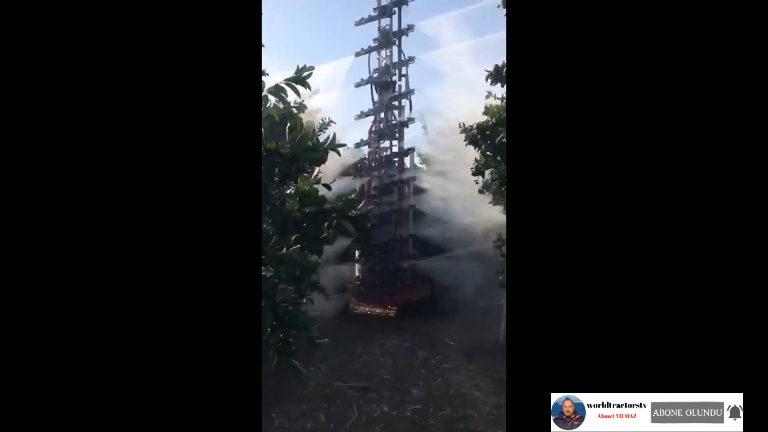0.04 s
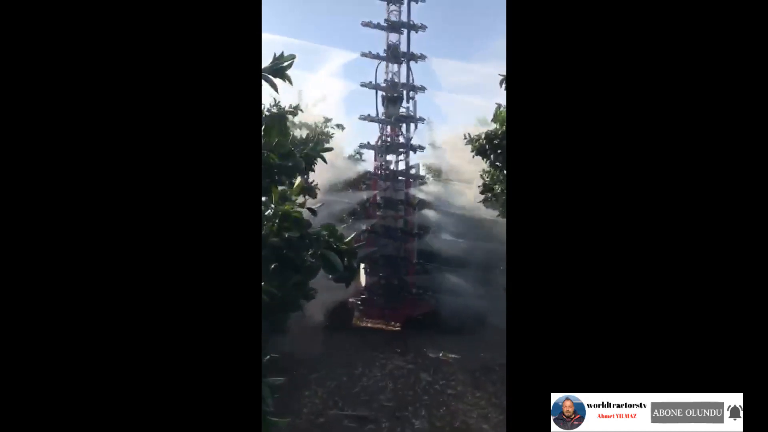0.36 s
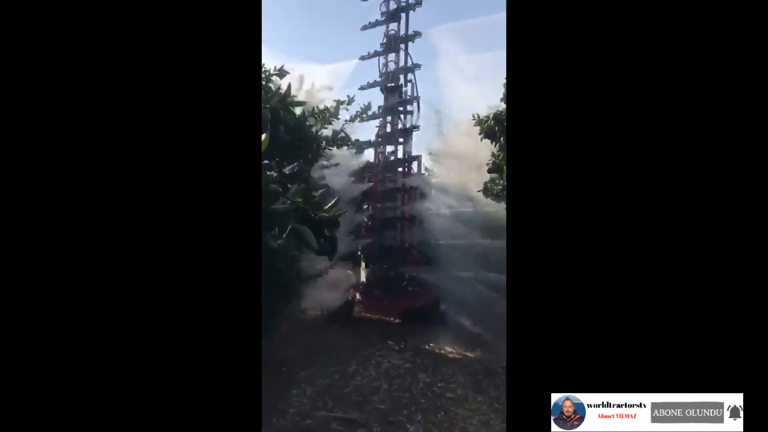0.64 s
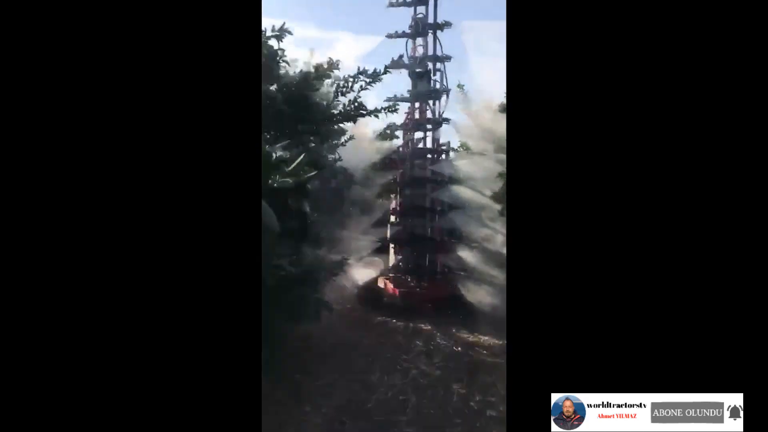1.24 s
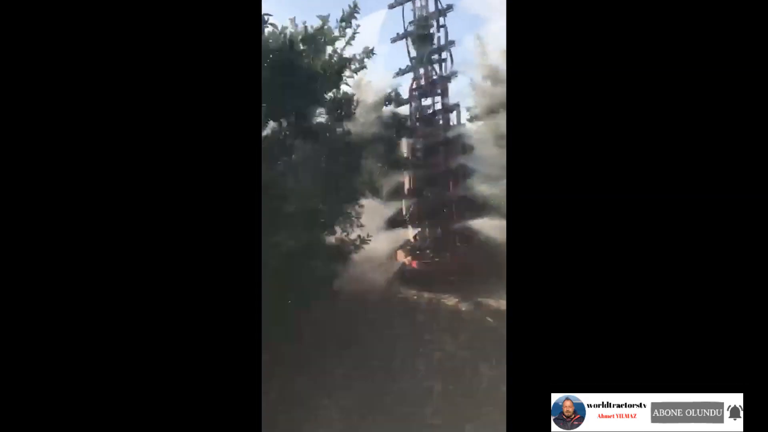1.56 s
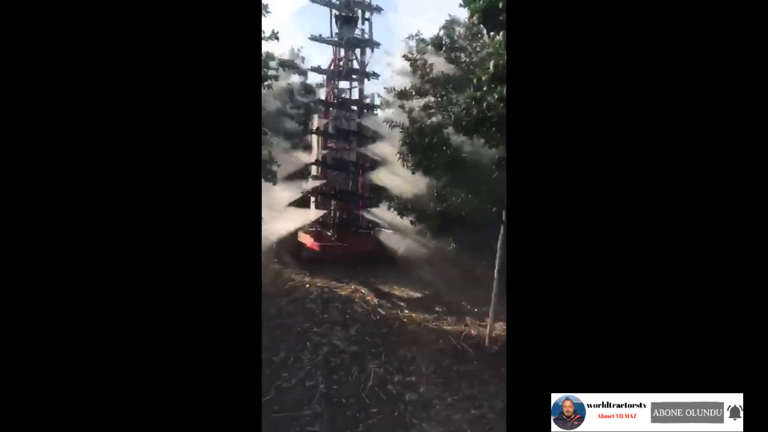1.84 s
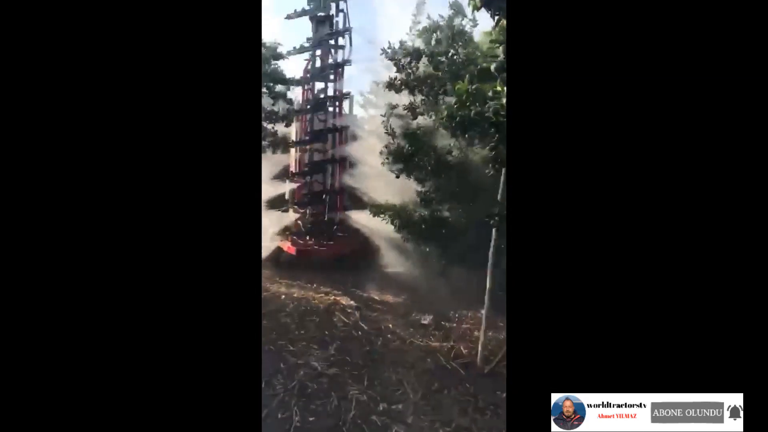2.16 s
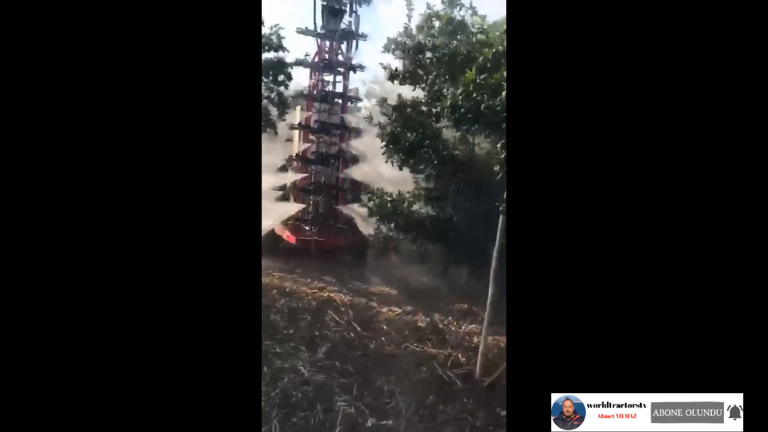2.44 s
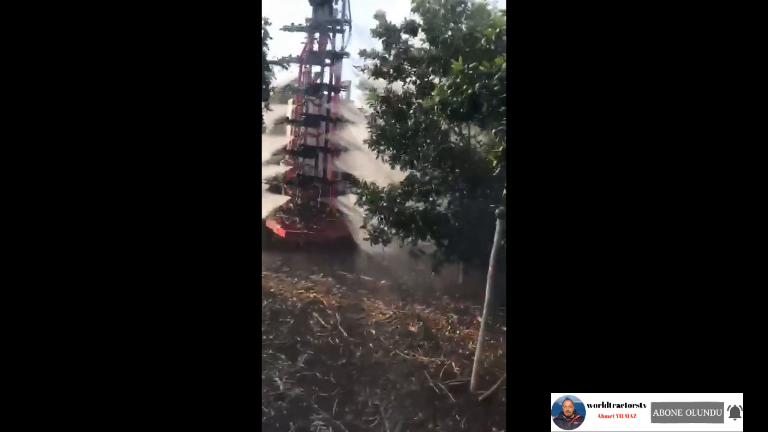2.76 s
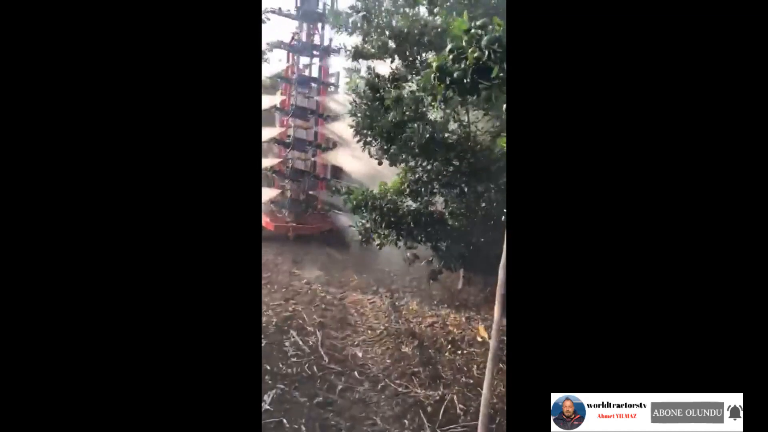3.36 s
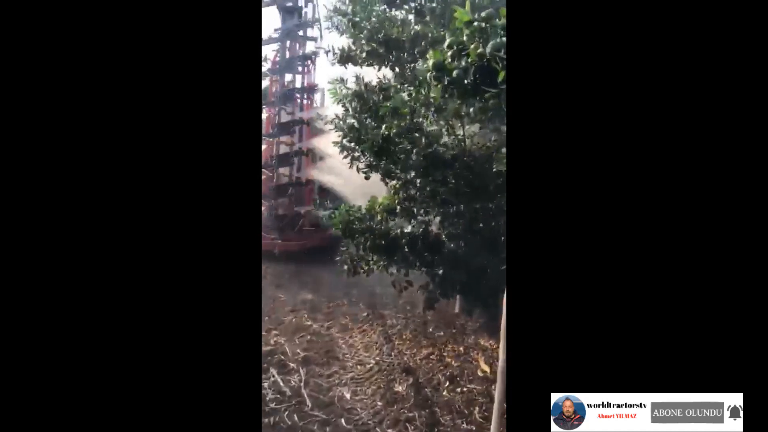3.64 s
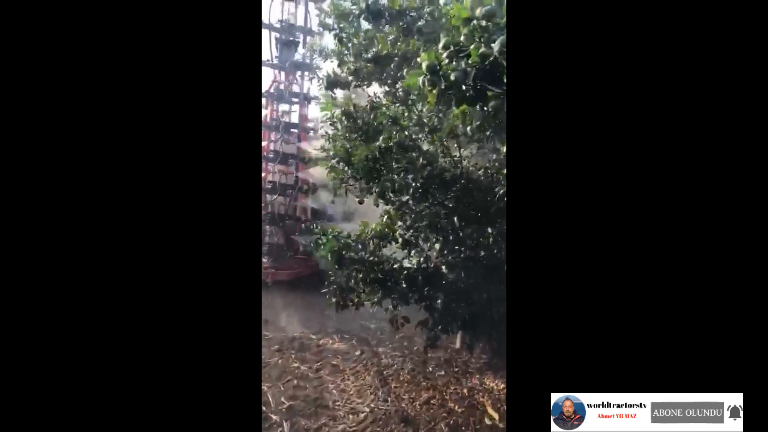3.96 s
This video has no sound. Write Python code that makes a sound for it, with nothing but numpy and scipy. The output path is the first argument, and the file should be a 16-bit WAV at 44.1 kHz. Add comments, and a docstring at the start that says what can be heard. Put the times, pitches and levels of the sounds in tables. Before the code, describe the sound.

A tower sprayer hissing loudly over its roaring blower and a droning tractor engine.

```python
"""A bright hiss of spray comes first, swelling whenever the mist blows into the nearby leaves.
It comes from the nozzles of a tall tower sprayer, towed by a tractor between orchard trees,
away from a mono microphone. Under the hiss the blower roars with a faint blade tone,
and the engine drones at a steady speed over a low rumble."""
import sys
import numpy as np
from scipy import signal
from scipy.fft import rfft, irfft, next_fast_len
from scipy.io import wavfile
from scipy.ndimage import uniform_filter1d, map_coordinates

SR = 44100
rng = np.random.default_rng(int(sys.argv[2]) if len(sys.argv) > 2 else 0)


def waveform_to_disk(signal):
    """Save audio, clipped to [-1, 1], as 16-bit WAV at the path in sys.argv[1]."""
    frames = np.transpose(np.atleast_2d(signal))
    scaled = np.clip(frames, -1, 1) * 32767
    samples = np.round(scaled).astype(np.int16)
    wavfile.write(sys.argv[1], SR, samples)


N = 176400


def amp(db):
    """Decibels to gain."""
    return 10 ** (np.asarray(db) / 20)


def unit(x):
    """Scaled to rms 1."""
    return x / np.sqrt(np.mean(x ** 2) + 1e-20)


def along(points, hz):
    """(Hz, value) points read on a log axis."""
    f, v = np.transpose(points)
    return np.interp(np.log(hz + 1), np.log(f + 1), v)


def curve(rows):
    """(s, value) rows as one value per sample."""
    return np.interp(np.arange(N) / SR, *np.transpose(rows))


def wobble(rate):
    """A smooth random curve, rate knots a second."""
    return map_coordinates(rng.standard_normal(int(N * rate / SR) + 4), [np.arange(N) * rate / SR])


def filtered(x, response):
    """x times a response of frequency."""
    m = next_fast_len(N + SR // 2)
    return irfft(rfft(x, m) * response(np.fft.rfftfreq(m, 1 / SR)), m)[..., :N]


def rush(spectrum, patchy_db):
    """Turbulent noise of rms 1, with patches of random gain."""
    bins = signal.stft(rng.standard_normal(N), nperseg=512)[2]
    patches = uniform_filter1d(rng.standard_normal(bins.shape), size=8, axis=0)
    patches = uniform_filter1d(patches, size=16, axis=1)
    noise = signal.istft(bins * amp(patchy_db * unit(patches)), nperseg=512)[1][:N]
    return unit(filtered(noise, lambda hz: amp(along(spectrum, hz))))


def tone(hz):
    """A sine of rms 1 that follows a pitch curve."""
    return np.sqrt(2) * np.sin(2 * np.pi * (np.cumsum(hz) / SR + rng.random()))


# The machine's low end, heard between the trees. Each row: frequency in Hz, level in dB per Hz.
RUMBLE_SPECTRUM = [(25, -32), (40, -16), (52, -5), (72, -6.5), (95, -5.5), (135, -5.5), (170, -2),
                   (195, -2.5), (235, -8), (280, -5), (350, -12.5), (470, -20.5), (900, -33)]


def rumble():
    """Engine and blower together make a low, slightly wavering noise."""
    return amp(-42 + 0.63 * wobble(10)) * rush(RUMBLE_SPECTRUM, patchy_db=0.0)


# The tractor's firing note at the microphone. Each row: time in seconds, level in dB.
FIRING_LEVEL = [(0, -40), (.15, -41.5), (.45, -43), (.57, -39.5), (1.13, -40), (1.21, -51), (1.42, -42),
                (1.56, -54), (1.75, -42), (1.86, -45), (2.0, -36.5), (2.1, -41), (2.22, -39), (2.47, -45.5),
                (2.75, -43), (3.0, -42), (3.34, -38.5), (3.49, -48), (3.6, -40), (3.7, -49), (3.77, -40),
                (3.84, -47), (4, -41)]
# Overtones as it pulls away. Each row: multiple of the firing rate, start and end levels in dB.
ENGINE_OVERTONES = [(2, -50.5, -46.5), (3, -49.5, -50), (7.5, -64.5, -64.5), (8.5, -66, -69)]


def engine():
    """The cylinders fire at a steady rate: a low note and its overtones, each wavering in level."""
    firing_hz = np.full(N, 58.85)
    drone = amp(curve(FIRING_LEVEL) + 0.6 * wobble(14)) * tone(firing_hz)
    for multiple, start_db, end_db in ENGINE_OVERTONES:
        level_db = np.linspace(start_db, end_db, N) + 0.8 * wobble(4.0)
        drone += amp(level_db) * tone(multiple * firing_hz)
    return drone


# Air leaving the blower, behind the tractor. Each row: frequency in Hz, level in dB per Hz.
ROAR_SPECTRUM = [(150, -41), (400, -8.5), (480, -8), (560, -1), (680, 0.5), (860, -5), (1020, 0),
                 (1180, -0.5), (1270, 1.5), (1380, -1), (1600, 0.5), (1800, -5), (2100, -5), (3000, -9.5),
                 (6000, -39)]
# That roar at the microphone. Each row: time in seconds, level in dB.
BLOWER_LEVEL = [(0.0, -40), (0.05, -38), (0.23, -39.5), (1.29, -38.5), (3.69, -39), (4.0, -38)]


def blower():
    """Rushing air makes a broad roar, and the passing blades a faint, drifting tone."""
    blade_hz = 162.3 * (1 + 0.0039 * wobble(3.01))
    blades = amp(-49.5 + 1.6 * wobble(5.37)) * tone(blade_hz)
    return blades + amp(curve(BLOWER_LEVEL)) * rush(ROAR_SPECTRUM, patchy_db=0.5)


# The tower's jets at the microphone. Each row: time in seconds, level in dB.
RASP_LEVEL = [(0, -50), (.86, -52), (.96, -41), (1.15, -47), (1.6, -49), (1.89, -38.5), (2.1, -44),
              (2.35, -40.5), (2.69, -40), (2.76, -46), (2.93, -45), (3.05, -50), (4, -48)]


def jets(flutter_hz, centre_hz=4080, width_hz=1100):
    """The jets rasp in a narrow band of noise that flutters in the air stream."""
    noise = rng.standard_normal(N)
    rasp = unit(filtered(noise, lambda hz: 1 / (1 + (2 * (hz - centre_hz) / width_hz) ** 2)))
    return amp(curve(RASP_LEVEL) + 1.6 * wobble(flutter_hz)) * rasp


# Mist striking the nearby leaves. Each row: frequency in Hz, level in dB per Hz.
MIST_SPECTRUM = [(700, -13), (1800, -5.5), (2400, 0), (3300, 1.5), (4100, 1), (4900, -0.5), (5900, 5),
                 (7000, 3), (7700, 0), (9300, 6), (10400, 2), (11200, 6.5), (12000, -10)]
# Its strength at the microphone. Each row: time in seconds, level in dB.
MIST_SWELLS = [(0, -34.5), (.25, -39), (.37, -36), (.48, -43), (.6, -32), (.72, -35.5), (.87, -41),
               (.955, -29), (1.06, -29.3), (1.15, -34), (1.37, -28.3), (1.44, -31.5), (1.66, -29),
               (1.88, -30), (1.98, -32.5), (2.07, -28), (2.38, -33), (2.69, -33.5), (2.75, -42),
               (3.05, -42), (3.58, -40), (3.76, -45), (3.87, -36), (3.91, -30), (4, -33)]


def mist(flutter):
    """Mist blows into the leaves in swells of hiss."""
    return amp(curve(MIST_SWELLS) + 0.73 * flutter) * rush(MIST_SPECTRUM, patchy_db=0.9)


# Nozzle hiss, rippled by the path to the microphone. Each row: frequency in Hz, level in dB per Hz.
NOZZLE_SPECTRUM = [(800, -44), (2000, -7.5), (3000, -3), (3900, -0.6), (4600, -0.8), (4900, -3), (5500, 0),
                   (6200, -1.5), (7200, -1.5), (7650, -3), (8200, -0.5), (9500, 1), (10000, -0.3),
                   (10400, 0.5), (10900, -0.2), (11500, 5), (12000, -2.5)]


def nozzles(flutter):
    """Spray leaves the nozzles with a bright, almost steady hiss."""
    return amp(-28.5 + 0.3 * flutter) * rush(NOZZLE_SPECTRUM, patchy_db=0.88)


# Lulls in the hiss at the microphone. Each row: centre and half length in seconds, dip in dB.
HISS_LULLS = [(.48, .024, -2.0), (.86, .035, -1.0), (3.72, .06, -.7)]


def spray(flutter_hz=22.09):
    """Nozzles, mist and jets flutter in the air stream and dip together in a few brief lulls."""
    flutter = wobble(flutter_hz)
    hiss = nozzles(flutter) + mist(flutter) + jets(flutter_hz)
    t = np.arange(N) / SR
    lull_db = sum(db * np.exp(-((t - centre) / half) ** 2) for centre, half, db in HISS_LULLS)
    return amp(lull_db) * hiss


def scene():
    """The whole machine, alike in both channels."""
    return np.tile(engine() + rumble() + blower() + spray(), (2, 1))


def record(dry):
    """The recorder keeps nothing above its band limit."""
    top_hz = 12060
    return filtered(dry, lambda hz: 1 / np.sqrt(1 + (hz / top_hz) ** 400))


dry = scene()
out = record(dry)
waveform_to_disk(out)
```